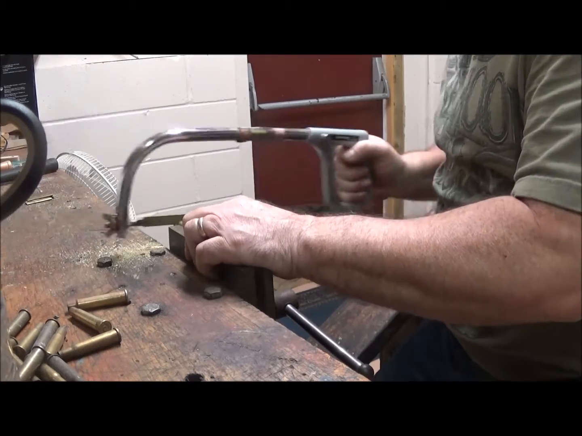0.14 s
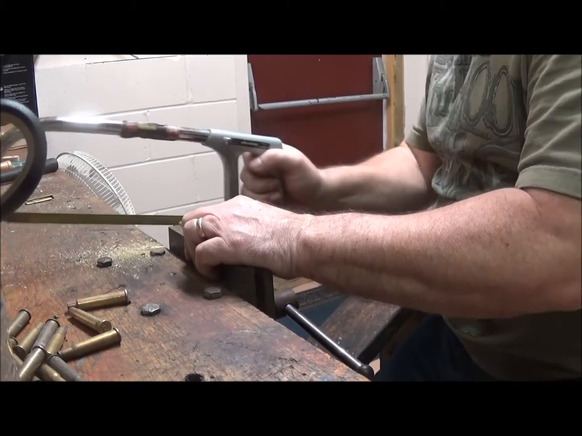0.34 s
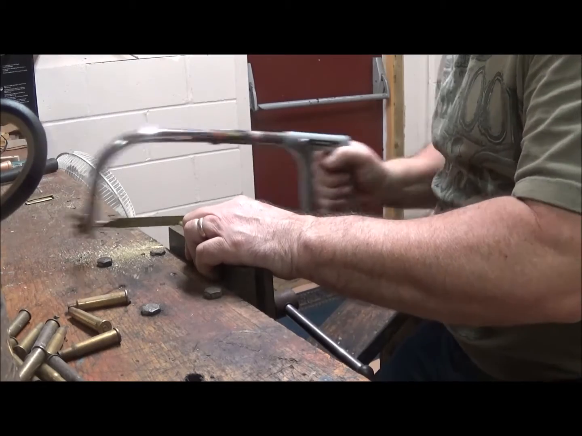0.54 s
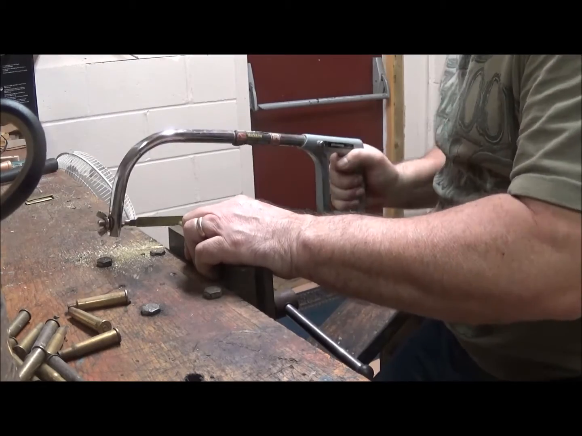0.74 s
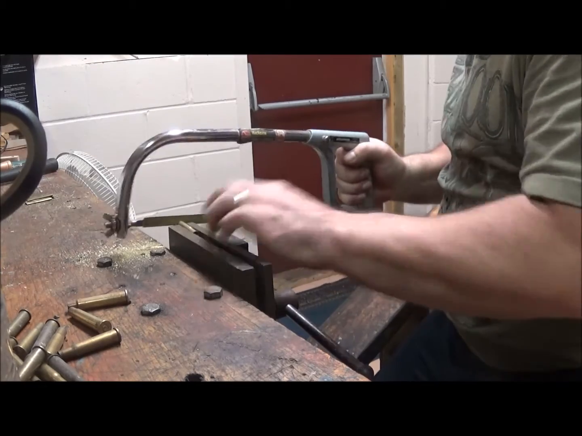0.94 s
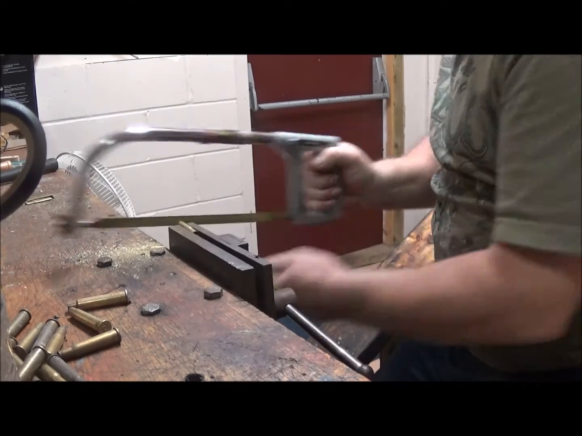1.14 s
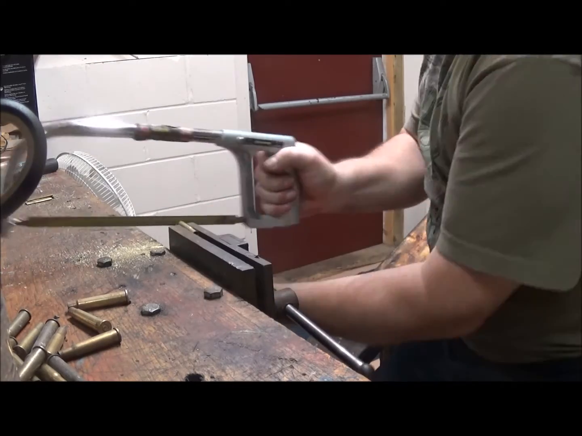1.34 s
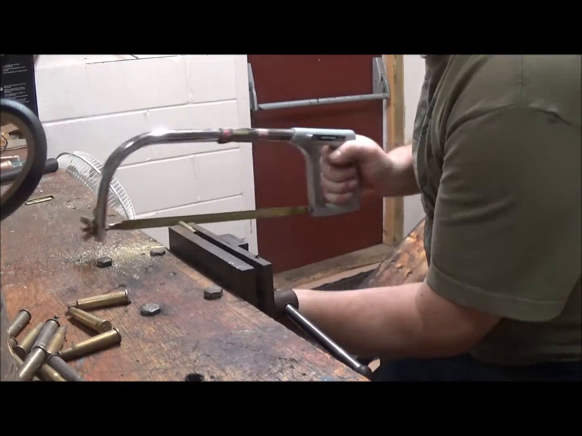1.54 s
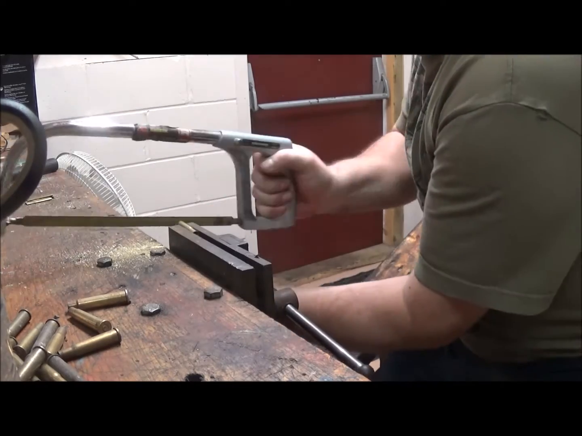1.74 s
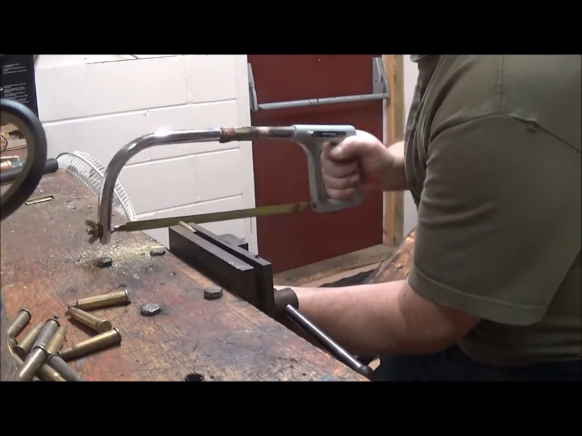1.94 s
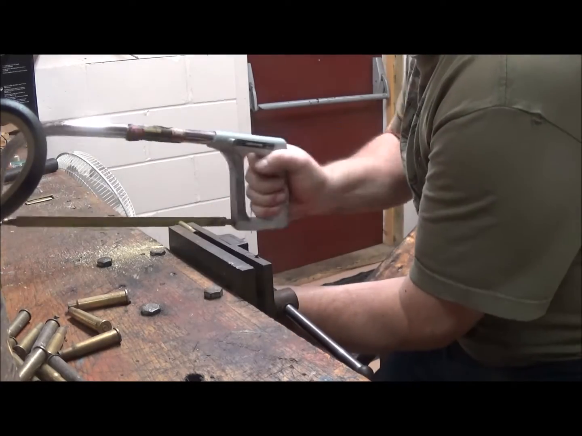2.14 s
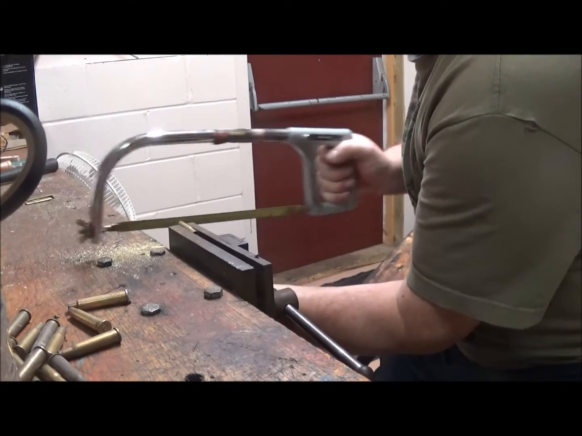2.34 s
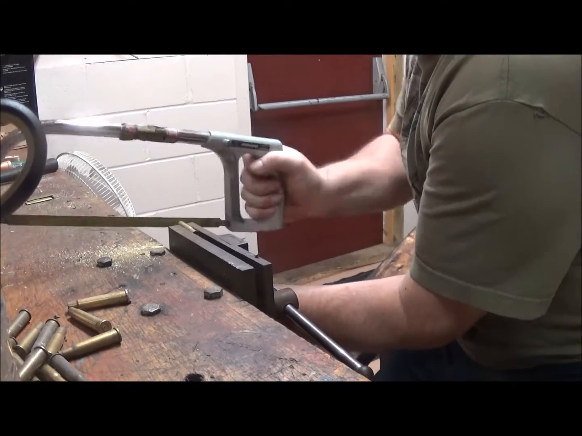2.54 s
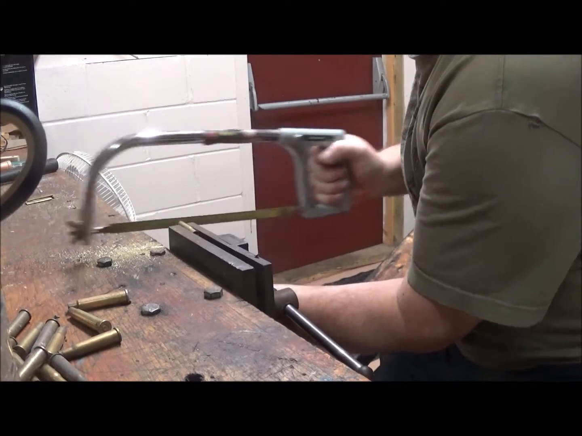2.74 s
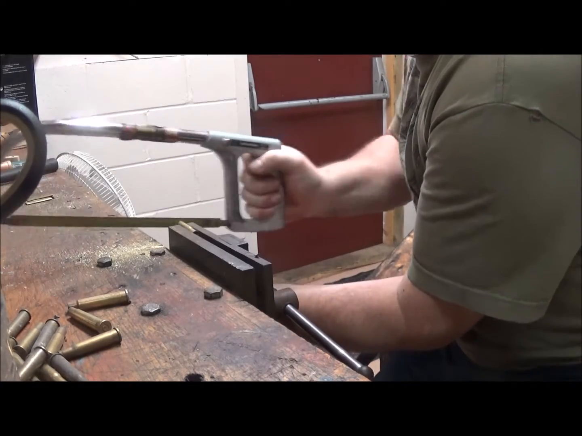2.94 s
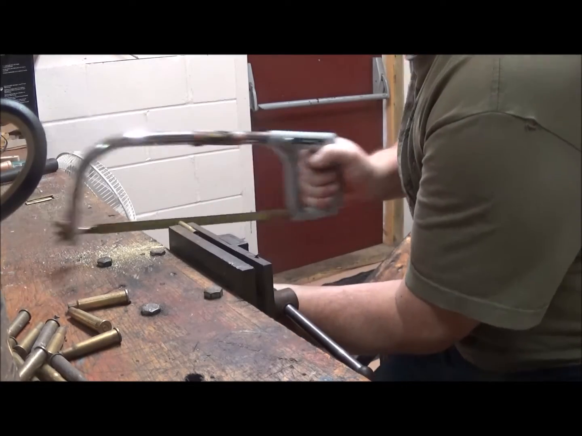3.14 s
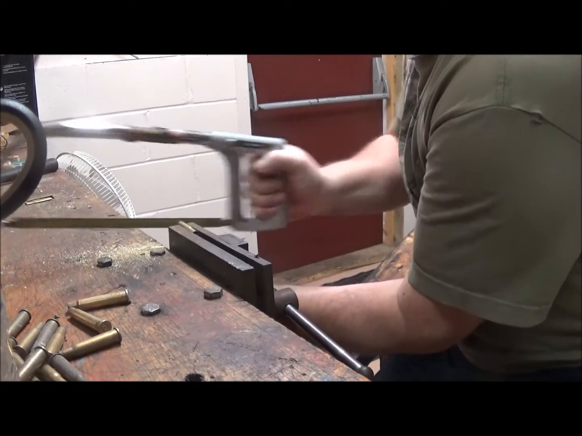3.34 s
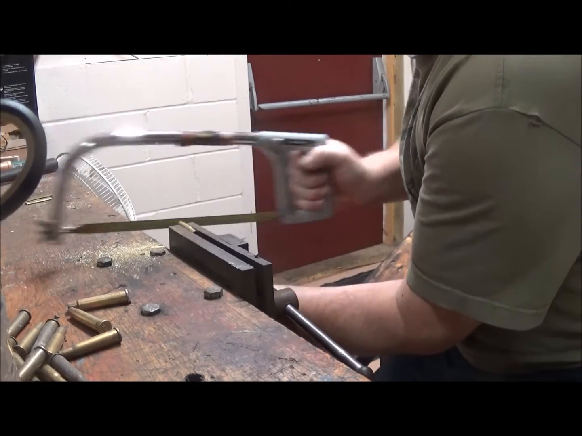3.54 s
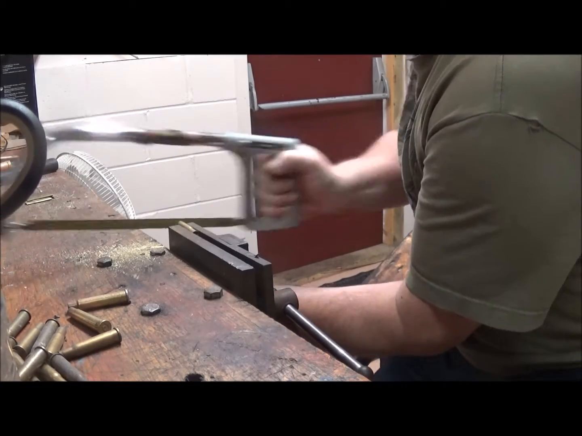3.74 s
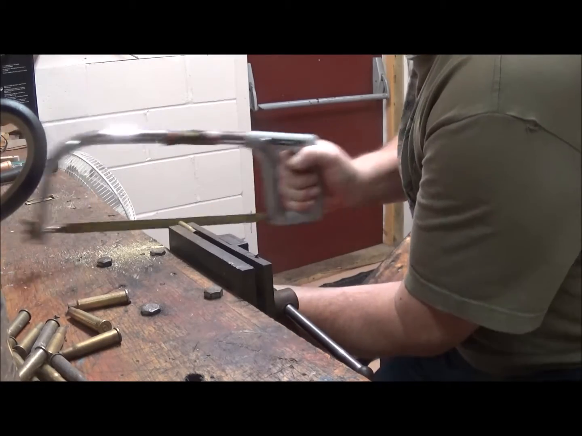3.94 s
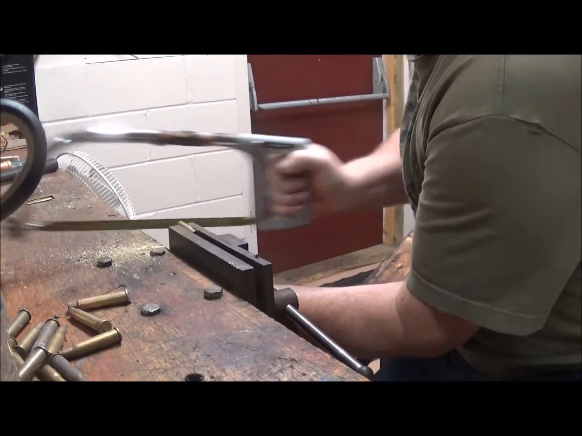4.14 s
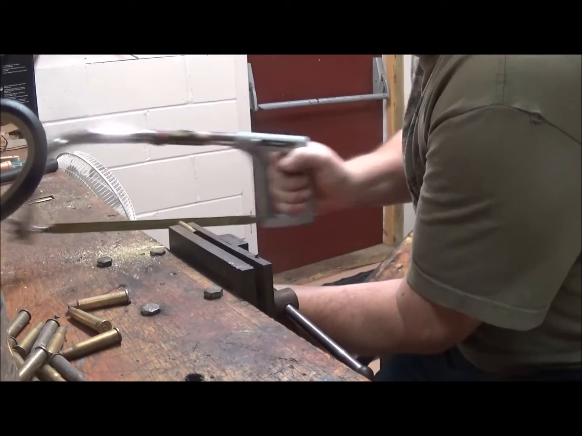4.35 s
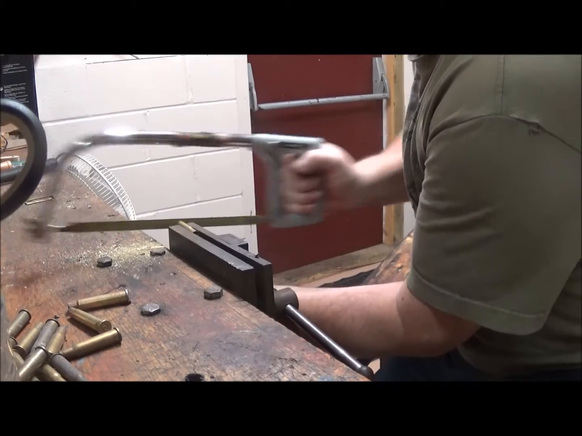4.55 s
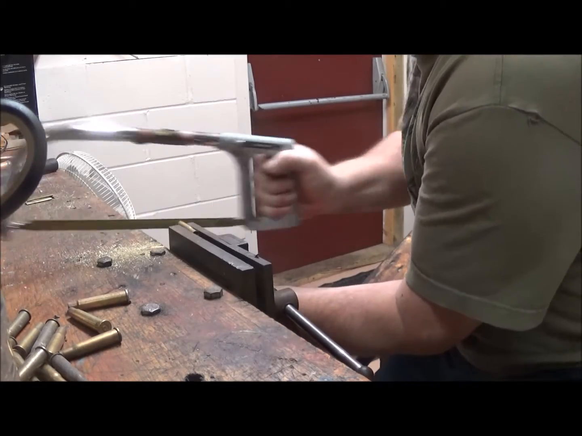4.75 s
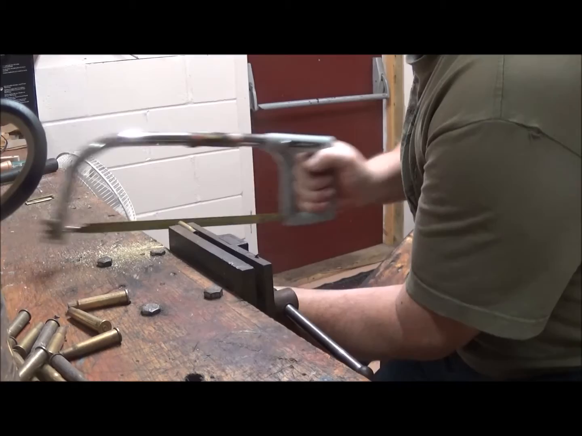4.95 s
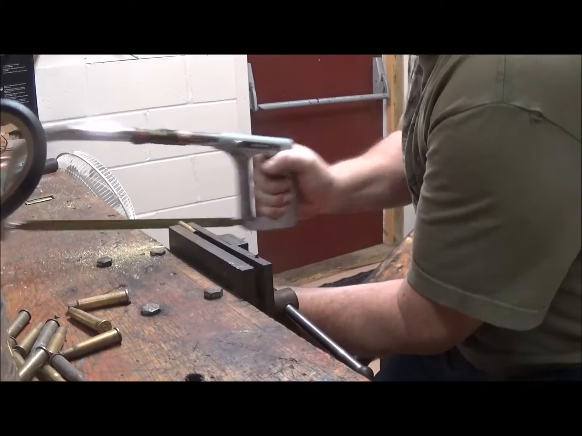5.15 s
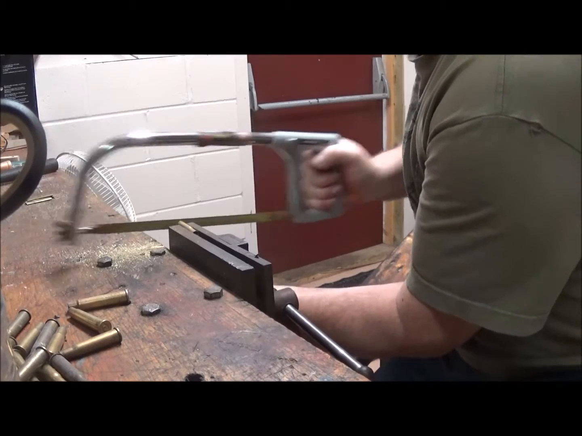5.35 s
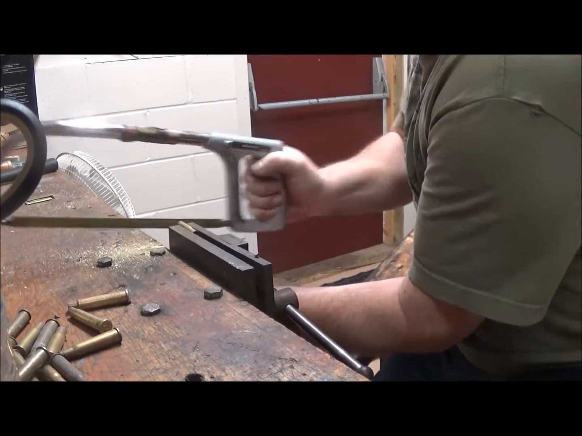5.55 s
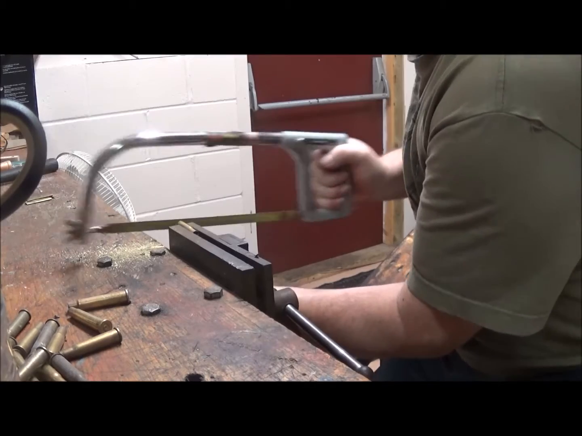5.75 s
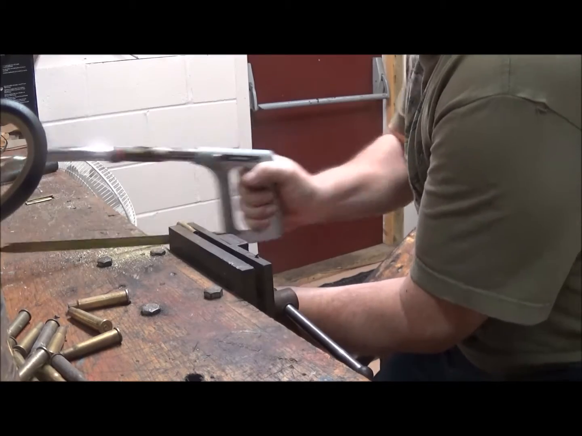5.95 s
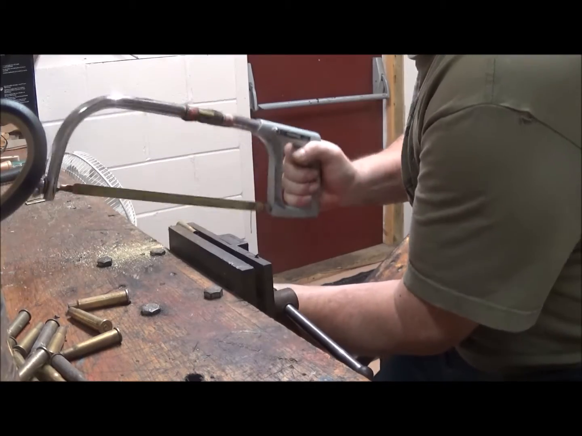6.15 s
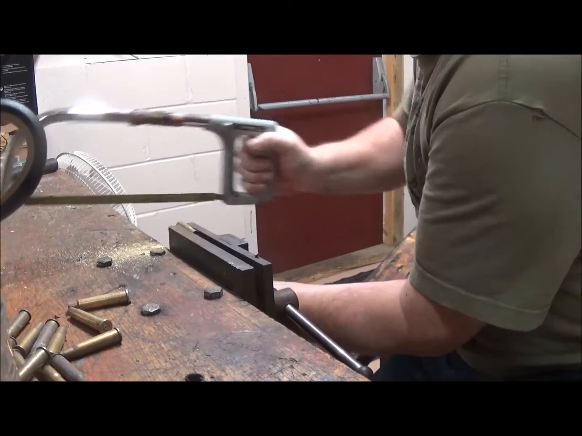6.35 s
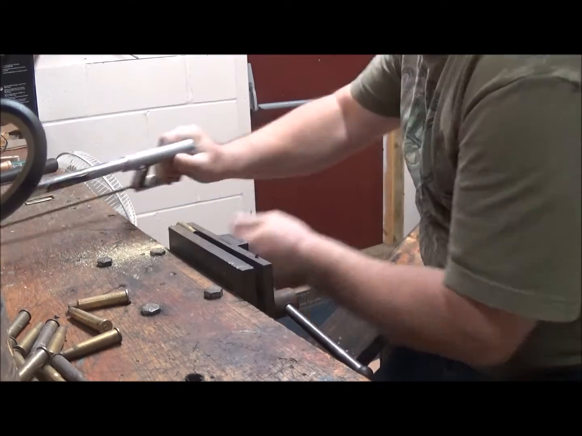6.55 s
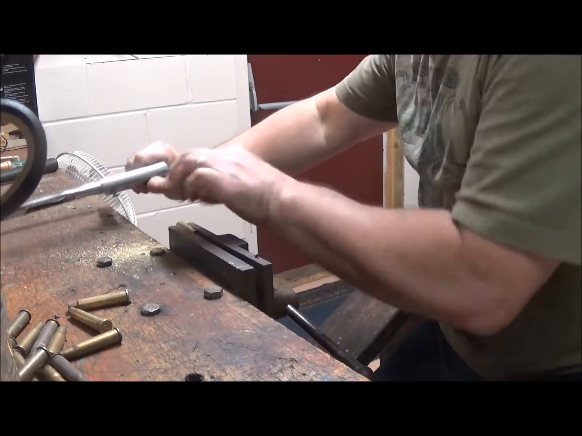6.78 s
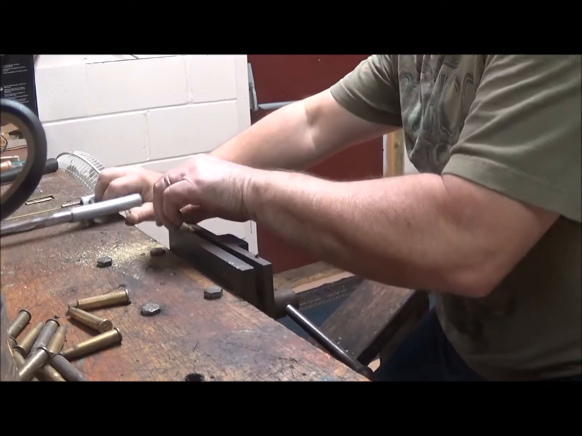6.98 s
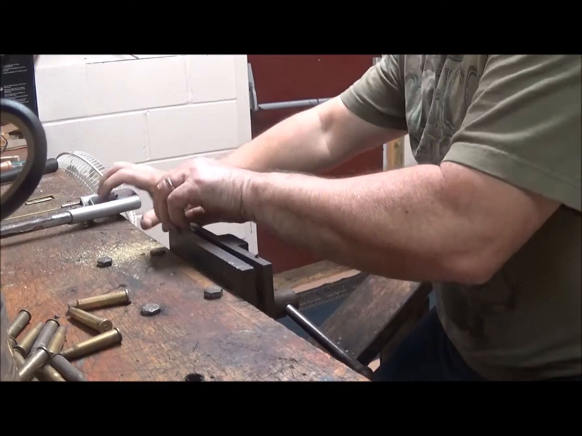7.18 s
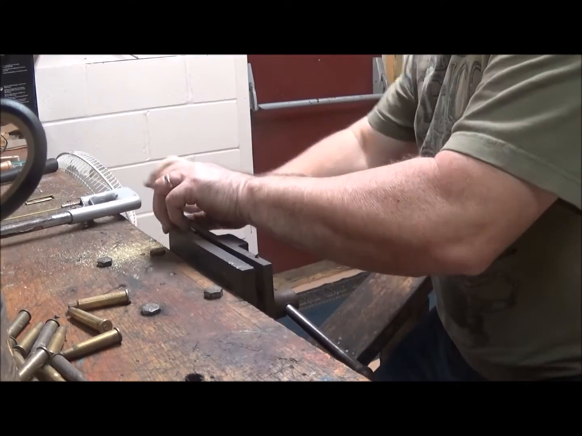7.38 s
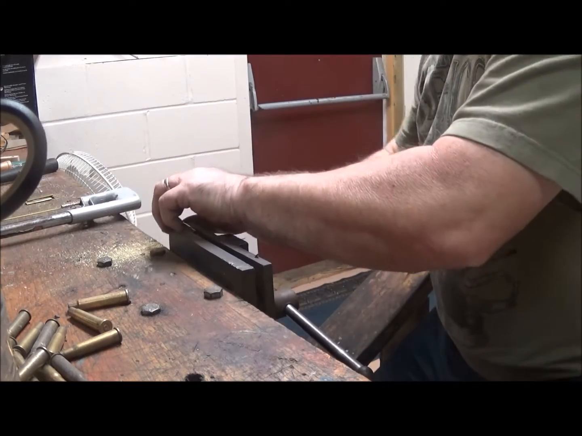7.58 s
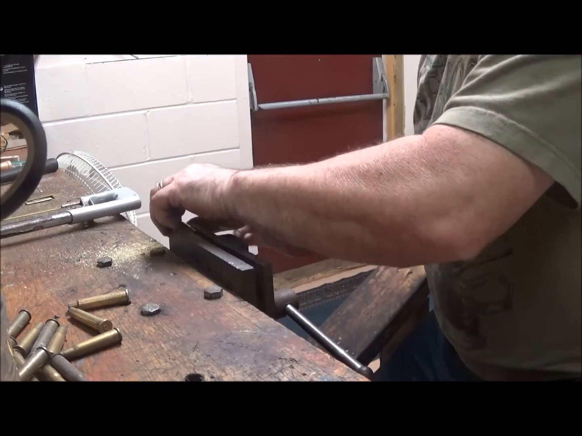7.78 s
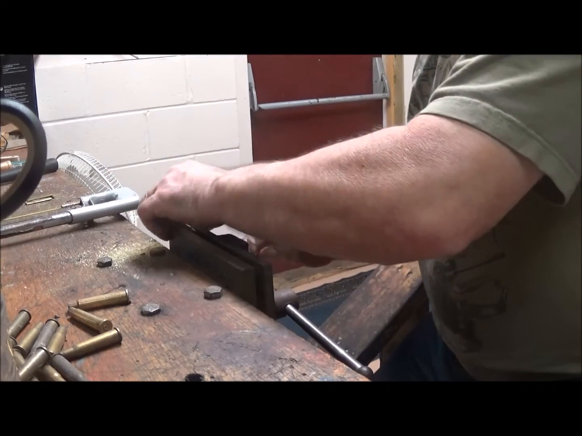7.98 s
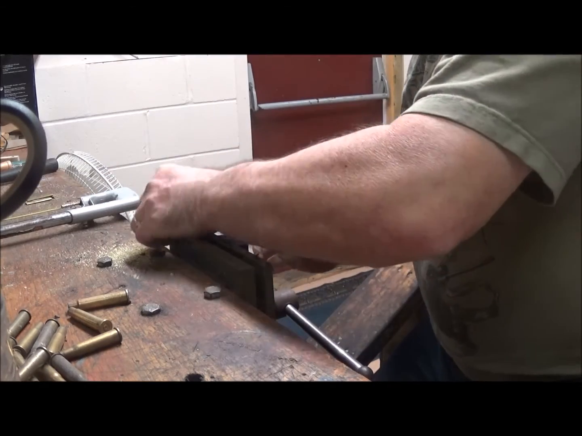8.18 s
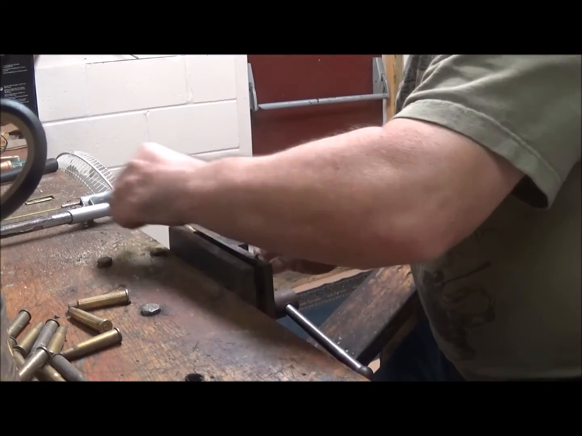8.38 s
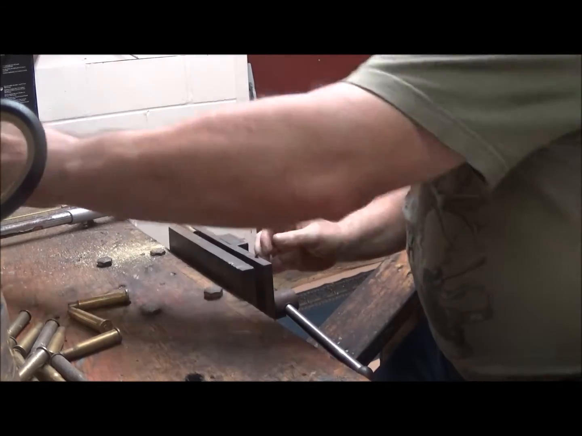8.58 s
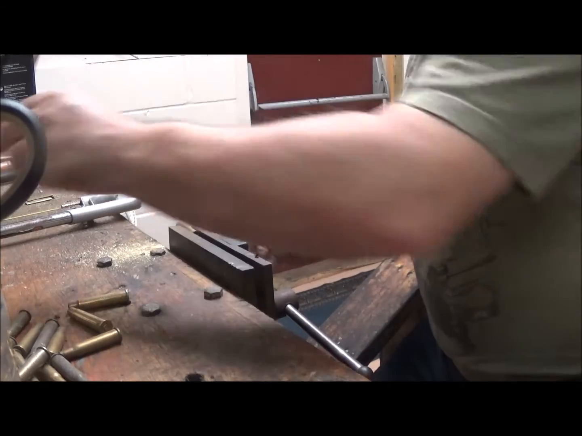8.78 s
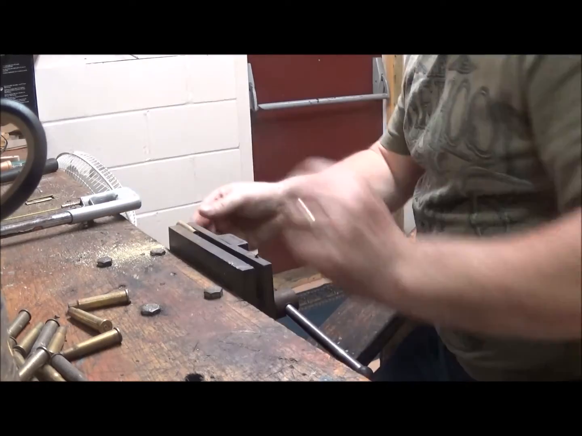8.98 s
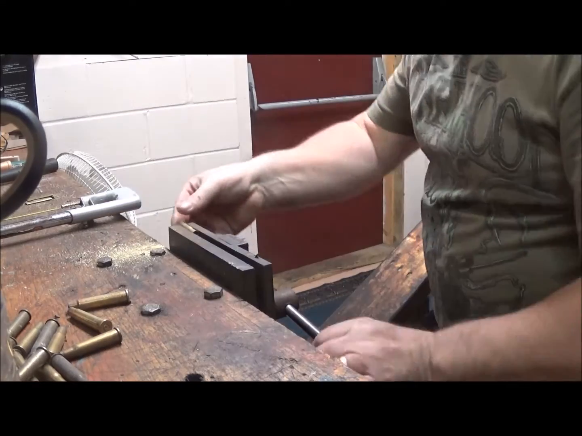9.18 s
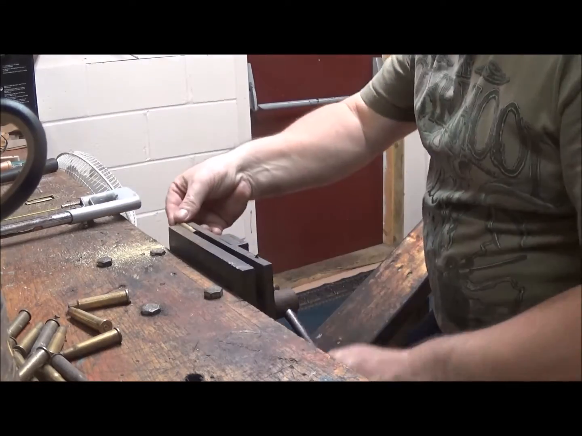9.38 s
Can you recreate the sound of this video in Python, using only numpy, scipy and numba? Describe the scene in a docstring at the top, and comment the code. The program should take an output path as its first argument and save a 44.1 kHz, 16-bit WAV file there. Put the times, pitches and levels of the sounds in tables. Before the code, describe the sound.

A hacksaw cuts a brass case in a vise from the start, close by, in a small workshop with a short echo and faint hum. After a brief hesitation just before 1 second, it settles into about two and a half back-and-forth strokes per second. The teeth buzz, rasp and occasionally snag, shaking the bench, while a metallic ring falls in pitch. Tiny high squeaks join from about 4 seconds. The sawing ends just after 6 seconds. Around 6.5 seconds the saw clatters onto the bench with several knocks, then scrapes briefly aside until about 7.2 seconds. It goes quiet, with a faint hiss slowly rising and one light tap at 8.2 seconds. At about 8.8 seconds the cut brass piece drops with a bright ping and rolls over with two small ticks. A hand softly rubs the bench from about 9.1 seconds.

```python
"""Over the faint air and hum of a small workshop, a hacksaw cuts a brass case held in a vise.
Its teeth buzz at a rate set by the blade's speed, tear off chips and shake vise and bench; the brass
wall rings lower as the cut deepens. After six seconds the saw clatters onto the bench and is pushed
aside, and a faint background hiss slowly rises. The cut piece drops with a bright ping and rolls over
as a hand rubs the bench. Throughout, block walls add a short echo and a limiter holds the peaks."""
import sys
import numpy as np
from scipy import signal
from scipy.fft import rfft, irfft
from scipy.io import wavfile
from scipy.ndimage import uniform_filter1d
from numba import njit

SR = 44100
rng = np.random.default_rng(int(sys.argv[2]) if len(sys.argv) > 2 else 0)


def waveform_to_disk(signal):
    """Save audio, clipped to [-1, 1], as 16-bit WAV at the path in sys.argv[1]."""
    frames = np.transpose(np.atleast_2d(signal))
    scaled = np.clip(frames, -1, 1) * 32767
    samples = np.round(scaled).astype(np.int16)
    wavfile.write(sys.argv[1], SR, samples)


N = 415418
T = np.arange(N) / SR

# Spectrum of the room's air. Each row: frequency in Hz, gain in dB.
AIR_SPECTRUM = [(25, -16), (110, 11.5), (253, -7), (304, 2.5), (364, -6.5), (3150, -9.5), (15000, -25)]
# Hum and whine of an appliance. Each row: frequency in Hz, level in dB.
HUM_TONES = [(307, -59.5), (3207, -73)]
# A push and its pull back. Each row: start and turn in seconds, pressure of push and of pull in dB,
# top tooth rate of the push in Hz, share of the push before top speed, singing gain in dB.
STROKES = [(-.22, -0.029, 0, -4.5, 899.2, 0.45, 0), (.196, .41, 4, -4.5, 910, .42, 2.5),
           (0.677, .87, -44.5, -29.5, 901.1, .4, 8), (1.069, 1.314, -2.5, -10.5, 861.6, 0.46, 9),
           (1.574, 1.759, -3, -2.5, 961.5, .22, -15), (1.989, 2.188, 0.5, -0.5, 913.3, 0.24, -2),
           (2.402, 2.602, 0, -4, 953.4, .27, 4.5), (2.82, 3.019, -2, -6.5, 960.5, .25, 6.5),
           (3.246, 3.444, -3.5, -3.5, 903.8, 0.32, 5.5), (3.66, 3.871, -3, -8, 950, 0.29, 8.5),
           (4.084, 4.282, -1.5, -6, 1014, .22, 13), (4.5, 4.705, 1, -3, 1034, .25, 6.5),
           (4.926, 5.128, 1, -5, 1026, .2, 11), (5.334, 5.538, -2, -5.5, 1021, .25, 10.5),
           (5.742, 5.954, -0.5, -20, 924, .38, 10.5)]
# Resonances of vise and work, the vise's mount, the blade (middle, top, squeak), the bench, the saw's
# frame, its slide and the rolling brass. Each row: frequency in Hz, bandwidth in Hz, gain in dB.
VISE_MODES = [(724, 42, -10), (816.2, 50.5, 1), (885.5, 91, -2), (977, 60, -11.5), (1135, 14, -9)]
MOUNT_MODES = [(221, 79, -8), (425, 55, -1), (573, 76, -0.5)]
BLADE_MODES = [(1655, 87, 4), (2490, 120, 7), (2667, 42, -0.5), (3700, 27, -1.5), (4650, 30, 3.5)]
BLADE_TOP_MODES = [(6350, 110, 1), (8260, 140, 1), (9160, 220, -4), (9950, 190, 1)]
SQUEAK_MODES = [(8480, 160, 0)]
BENCH_MODES = [(113.8, 9.9, -4), (127.2, 29, -1.5)]
FRAME_MODES = [(412, 36, 2), (562, 76, 6), (1145, 19, 7), (2220, 83, -6), (2550, 88, -1.5), (3210, 91, 3),
               (3400, 8, 4), (6430, 120, -8), (10000, 28, 0)]
SLIDE_MODES = [(145.5, 100, 19.6), (390, 84, 9.8), (644, 63, 17)]
ROLL_MODES = [(5050, 30, 0), (8080, 30, -13)]
# Spectra of tearing, impact, hiss and rubbing. Each row: frequency in Hz, gain in dB.
CHIP_SPECTRUM = [(300, -44.5), (900, 3), (2600, -4.5), (5200, -14), (9600, -5), (12000, -23), (15500, -30)]
THUD_SPECTRUM = [(60, -34), (105, 1.5), (212, 3), (572, 1.5), (1220, -10.5), (3290, -10), (13000, -30.5)]
HISS_SPECTRUM = [(200, 0), (10000, -10.5), (15000, -21.5)]
HAND_SPECTRUM = [(40, -11), (110, 7.5), (700, -4), (1300, -17), (12000, -35.5)]
# The falling resonance of the brass wall. Each row: time in seconds, frequency in Hz, gain in dB.
WALL_RING = [(.1, 3790, -7), (.55, 3770, 1), (1.25, 3750, -6), (1.5, 3270, 8), (1.91, 3040, 4),
             (2.3, 2770, 7), (2.48, 2620, 2), (2.72, 2280, 5), (3.2, 2000, -3), (4.4, 1650, -14)]
# Brief events: teeth snag, the bench is jolted, the blade squeaks, the cut piece rolls over.
# Each row: time in seconds, level in dB.
HARD_SNAGS = [(.447, 7), (.642, -6), (1.827, 13), (2.222, 16), (3.484, 5), (4.368, 11.5), (4.398, 8.5),
              (4.462, 10), (5.195, 6), (5.621, 20.5), (5.909, 17.5)]
JOLTS = [(0.359, -1.5), (0.653, -4), (0.95, -9.5), (1.079, 0), (1.688, -9)]
SQUEAKS = [(4.2, -14), (4.635, -15.5), (5.045, -13.5), (5.47, -16.5), (5.857, -8)]
ROLLS = [(8.998, -39), (9.333, -39.5)]
# The saw hits the bench. Each row: time in seconds, thud in dB, frame ring in dB, thud cutoff in Hz.
KNOCKS = [(6.472, -3, 2.5, 12000), (6.479, -4.5, -2.5, 9000), (6.53, 0, -7.5, 10100),
          (6.562, -0.5, -18.5, 1950), (6.611, -3, -11.5, 5000), (6.81, -5.5, -16.5, 10900),
          (8.188, -26.5, -42, 10100)]
# Envelopes of the sliding saw, the hiss and the hand. Each row: time in seconds, level in dB.
SLIDE_LEVELS = [(6.72, -42), (6.83, -27), (6.99, -27), (7.03, -19.5), (7.16, -46), (7.42, -57)]
HISS_LEVELS = [(7.2, -64), (8.6, -53.5), (9.42, -50.5)]
HAND_LEVELS = [(9.13, -41), (9.15, -34), (9.42, -38.5)]
# The cut piece lands and chatters. Each row: time in seconds, ping in dB, thud in dB.
LANDINGS = [(8.753, 1.5, -30), (8.766, -0.5, -44), (8.795, -16, -57)]
# Its free vibration. Each row: frequency in Hz, level in dB, time to fall 60 dB in seconds.
BRASS_MODES = [(4770, -5, 0.077), (4945, 4, 0.065), (4965, -21.5, 0.46), (8040, 2, 0.16), (8048, -11, .25),
               (8172, -17, .22), (11690, -10.5, 0.1), (14500, -17, .087)]
# The vise lies left, the bench right. Each row: frequency in Hz, left minus right in dB.
BALANCE = [(120, -2), (300, 3), (700, 4), (1500, 1.2), (10000, .3)]

PUSH_FULLNESS = .75  # exponent; below 1 the push holds its speed longer
PULL_RATE, PULL_CREST = 1.12, .55  # top speed relative to the push; share before top speed
PUSH_BITE_DB, PULL_BITE_DB = -7, -13.5  # teeth dig in forwards and drag backwards
TURN_S, REST_S = .02, .008  # standstill before a pull and before a push
LIFT_S, LIFT_DB_PER_S, SAW_END_S = 5.979, 142, 6.15  # the blade is eased out of the cut
TOP_HZ = 15750


def undb(db):
    """Decibels to amplitude ratio."""
    return 10 ** (np.asarray(db) / 20)


def unit(x):
    """Normalisation to rms 1."""
    return x / np.sqrt(np.mean(x ** 2))


def noise():
    """White Gaussian noise."""
    return rng.standard_normal(N)


def walk(rate_hz):
    """Moving averages smooth noise into a wander of rms 1."""
    span = max(2, int(SR / rate_hz))
    return unit(uniform_filter1d(uniform_filter1d(noise(), span), span))


def fade(rows):
    """Envelope through (s, dB) rows, silent before the first."""
    return undb(np.interp(T, *np.transpose(rows), left=-120))


def swells(rows, length_s):
    """Gaussian envelopes centred on (s, dB) rows."""
    return sum(undb(db) * np.exp(-np.minimum(((T - s) / length_s) ** 2, 50)) for s, db in rows)


def convolve(x, response):
    """A linear system convolves its input with its impulse response."""
    return signal.fftconvolve(x, response)[:N]


def colour(x, points, size=4096):
    """Minimum-phase filter of unit energy, shaped by (Hz, dB) points."""
    hz, db = np.transpose(points)
    grid = np.maximum(np.arange(size // 2 + 1) * SR / size, 1)
    cepstrum = irfft(np.log(undb(np.interp(np.log(grid), np.log(hz), db))))
    cepstrum[1:size // 2] *= 2
    cepstrum[size // 2 + 1:] = 0
    response = irfft(np.exp(rfft(cepstrum)))
    return convolve(x, response / np.linalg.norm(response))


def resonate(x, modes):
    """Forced vibration: the responses of (Hz, bandwidth, dB) modes add."""
    f = np.maximum(np.arange(SR // 2 + 1), 1)
    response = irfft(sum(undb(db) / (1 + 1j * (f * f - hz * hz) / (f * w)) for hz, w, db in modes))
    return convolve(x, response[:SR // 2])


@njit
def glide(x, hz, width_hz):
    """State-variable resonator with a moving centre frequency."""
    y, band, low = np.empty(len(x)), 0., 0.
    for i in range(len(x)):
        g, damping = np.tan(np.pi * hz[i] / SR), width_hz / hz[i]
        v = (band + g * (x[i] - low)) / (1 + g * (g + damping))
        band, low, y[i] = 2 * v - band, low + 2 * g * v, damping * v
    return y


def decay(t60):
    """One second of exponential decay, falling 60 dB in t60 seconds."""
    return np.exp(-np.log(1000) * T[:SR] / t60)


def burst(t60):
    """Decaying noise, the broadband force of a contact."""
    return rng.standard_normal(SR) * decay(t60)


def blows(times, levels_db, sound):
    """Superposition of a fresh sound() at each time."""
    out = np.zeros(N + SR)
    for s, db in zip(times, levels_db):
        out[int(s * SR):int(s * SR) + SR] += undb(db) * sound()
    return out[:N]


def workshop_air():
    """Air noise, partly correlated between channels, lies under an appliance's wavering tones."""
    hum = 0
    for hz, db in HUM_TONES:
        phase = 2 * np.pi * np.cumsum(hz * (1 + .00291 * walk(8.4))) / SR
        hum += undb(db) * np.sqrt(2) * np.sin(phase)
    shared = noise()
    return np.array([undb(-57) * colour(unit(shared + .5 * noise()), AIR_SPECTRUM) + hum
                     for _ in range(2)])


def swing(travel, crest):
    """Speed (0-1) from rest to rest: a skewed half sine peaking at the share crest of its time."""
    skew = np.log(.5) / np.log(np.clip(crest, .05, .95))
    return np.abs(np.sin(np.pi * np.clip(travel, 0, 1) ** skew))


def arm():
    """Reciprocating motion: a sharp push and an even pull, with tooth rate proportional to speed."""
    starts = np.transpose(STROKES)[0]
    stroke = np.maximum(np.searchsorted(starts, T, side="right") - 1, 0)
    start, turn, push_db, pull_db, top_hz, crest, sing_db = np.transpose(STROKES)[:, stroke]
    end = np.append(starts[1:], SAW_END_S)[stroke] - REST_S
    pushing = T < turn
    travel = (T - start) / (turn - start - TURN_S)
    pull_speed = swing((T - turn) / (end - turn), PULL_CREST)
    speed = np.where(pushing, swing(travel, crest) ** PUSH_FULLNESS, pull_speed)
    tooth_hz = top_hz * speed * np.where(pushing, 1, PULL_RATE)
    press = undb(np.where(pushing, push_db, pull_db) - LIFT_DB_PER_S * np.maximum(T - LIFT_S, 0))
    bite = undb(np.where(pushing, PUSH_BITE_DB, PULL_BITE_DB))
    sing = np.exp(-((travel - .52) / .22) ** 2)  # in mid-push the teeth cut evenly and sing
    return speed, tooth_hz, press, bite, sing, undb(sing_db * sing)


def teeth(speed, tooth_hz, press, bite, sing, sing_gain):
    """Periodic tooth impacts give a buzz, its second harmonic and pulsed friction noise (grit)."""
    jitter = (.022 + .08 * (1 - sing) ** 2) * walk(300)
    phase = 2 * np.pi * np.cumsum(tooth_hz * (1 + jitter)) / SR
    pulses = np.exp(np.cos(phase) - 1)
    # a blade that does not bite skips, and it stalls just before a snag breaks free
    judder = undb(5.2 * walk(75) * (1 - .7 * sing) / (1 + bite))
    stall = undb(-8 * swells([(s - .011, 0) for s, _ in catches()], .009))
    force = press * stall * judder
    grit = force * unit(noise() * (pulses + .4) * undb(2.8 * walk(600)))
    cut = force * bite * speed * sing_gain * undb(4 * (1 - sing) * walk(150))
    # uneven chips smear the buzz into a growl
    growl_hz = .8 * tooth_hz + 170
    growl = undb(18.5 - 9 * sing) * glide(glide(grit * speed ** .6, growl_hz, 420.), growl_hz, 420.)
    buzz = cut * np.sin(phase) + bite * growl
    return buzz, undb(-16) * cut * np.sin(2 * phase), grit


def vise(buzz, grit, speed):
    """Buzz and friction force the vise and its mount into resonance."""
    tone = undb(-4.5) * resonate(buzz, VISE_MODES) + undb(-6.5) * resonate(buzz, MOUNT_MODES)
    scrape = undb(7.5) * resonate(grit * speed ** .54, VISE_MODES)
    return tone + scrape + undb(-5) * resonate(grit * speed ** .3, MOUNT_MODES)


def chips_and_blade(grit, speed):
    """Tearing chips radiate noise and excite the blade's modes, both rising steeply with speed."""
    chips = undb(-9) * colour(grit * speed ** 2.83, CHIP_SPECTRUM)
    blade = undb(-5) * resonate(grit * speed ** 3.53, BLADE_MODES)
    return chips + blade + undb(-7) * resonate(grit * speed ** 5.1, BLADE_TOP_MODES)


def brass_wall(grit, speed):
    """The chattering wall's resonance falls as the cut deepens, strongest as the blade breaks through."""
    s, hz, db = np.transpose(WALL_RING)
    gain = undb(np.interp(T, s, db) + 7 * walk(130))
    return gain * glide(grit * speed ** 1.3, np.interp(T, s, hz), 160.)


def bench_rumble(press, speed):
    """The bench's low modes are driven hardest while the teeth pass slowly."""
    shaking = noise() * np.sqrt(press) * speed ** .055 * undb(-10 * speed)
    return undb(6.5) * resonate(shaking, BENCH_MODES)


def catches(delay_s=.011):
    """Snags as (s, dB): one early in each push, proportional to its pressure, plus the hard ones."""
    return [(s + delay_s, push_db) for s, _, push_db, *_ in STROKES if s > 0] + HARD_SNAGS


def snags():
    """Impulse excitation: a catching tooth rings the vise and tears chips."""
    force = blows(*np.transpose(catches()), lambda: burst(.015) * (1 - decay(.01)))
    return undb(12.5) * resonate(force, VISE_MODES) + undb(-30.5) * colour(force, CHIP_SPECTRUM)


def jolts():
    """Transient forces excite the low modes of bench and mount."""
    force = blows(*np.transpose(JOLTS), lambda: burst(.19))
    dulled = colour(force, [(500, 5), (5000, -16.5)])
    return undb(14) * resonate(force, BENCH_MODES) + undb(-11.5) * resonate(dulled, MOUNT_MODES)


def squeaks():
    """Friction briefly excites one high resonance as the blade slows."""
    return unit(resonate(noise(), SQUEAK_MODES)) * swells(SQUEAKS, .0078)


def hacksaw():
    """Source and resonator: the teeth sound directly and through everything they shake."""
    speed, tooth_hz, press, bite, sing, sing_gain = arm()
    buzz, harmonic, grit = teeth(speed, tooth_hz, press, bite, sing, sing_gain)
    direct = undb(-11.5) * buzz + harmonic
    metal = vise(buzz, grit, speed) + chips_and_blade(grit, speed) + squeaks() + brass_wall(grit, speed)
    return direct + metal + bench_rumble(press, speed) + snags() + jolts()


def saw_laid_down():
    """Impacts thud on the bench and ring the frame; the saw then slides by stick-slip friction."""
    contacts = 0
    for s, thud_db, _, cutoff_hz in KNOCKS:
        lowpass = signal.butter(4, cutoff_hz, fs=SR, output="sos")
        contacts += signal.sosfilt(lowpass, blows([s], [thud_db], lambda: burst(.053)))
    thuds = undb(-9) * colour(contacts, THUD_SPECTRUM)
    times, _, ring_db, _ = np.transpose(KNOCKS)
    frame = undb(2) * resonate(blows(times, ring_db, lambda: burst(.13)), FRAME_MODES)
    friction = noise() * undb(2.9 * walk(180))
    slips = colour(friction, [(45, -26), (130, -1), (800, 2.5), (1400, -7), (12000, -15)])
    return thuds + frame + unit(resonate(slips, SLIDE_MODES)) * fade(SLIDE_LEVELS)


def rising_hiss():
    """Broadband noise under a growing envelope: a faint hiss slowly rises after the sawing."""
    return colour(noise() * undb(walk(15)), HISS_SPECTRUM) * fade(HISS_LEVELS)


def brass_ring():
    """Free vibration in damped modes; phases are random, as each blow lands on another spot."""
    return sum(undb(db) * decay(t60) * np.sin(2 * np.pi * (hz * T[:SR] + rng.random()))
               for hz, db, t60 in BRASS_MODES)


def dropped_brass():
    """Each impact rings the short tube, with a crack and a thud; rolling over excites it softly."""
    times, ping_db, thud_db = np.transpose(LANDINGS)
    ping = blows(times, ping_db, brass_ring)
    crack = colour(blows(times, ping_db, lambda: burst(.11)),
                   [(2000, -21), (4800, 13), (6500, -3), (8200, 2), (10000, 10), (15000, -38)])
    thud = colour(blows(times, thud_db, lambda: burst(.27)),
                  [(70, -17), (170, 16.5), (300, 6), (900, -10.5), (3000, -44)])
    roll = resonate(noise() * swells(ROLLS, .0057), ROLL_MODES)
    return undb(-7) * ping + undb(-18.5) * crack + undb(7) * thud + undb(26) * roll


def hand():
    """Friction of a hand on the bench gives low, uneven noise."""
    return colour(noise() * undb(2 * walk(71)), HAND_SPECTRUM) * fade(HAND_LEVELS)


def room(x, wet_db=-6, t60=.27, spread=.34):
    """Reverberation: wall reflections, nearly alike in both channels, add to the direct sound."""
    def echo(spectrum):
        reflections = burst(t60) * (1 - np.exp(-T[:SR] / .00018))
        tail = colour(np.pad(reflections, (0, N - SR)), spectrum)[:SR]
        return convolve(x, tail / np.linalg.norm(tail))
    mid = echo([(120, 9.9), (2000, 10.4), (15000, 5.5)])
    side = spread * echo([(900, 5.5), (8000, 2.5), (15000, -33.5)])
    pan_db = np.interp(np.arange(N // 2 + 1) * SR / N, *np.transpose(BALANCE))
    return np.array([irfft(rfft(x + undb(wet_db) * (mid + sign * side)) * undb(sign * pan_db / 2), N)
                     for sign in (1, -1)])


def scene():
    """The sources superpose in one small room; the brass lands further to the left."""
    brass = room(dropped_brass()) * undb([[1.06], [-1.06]])
    return room(hacksaw() + saw_laid_down() + hand() + rising_hiss()) + brass + workshop_air()


@njit
def follow(peaks, attack, release):
    """Envelope follower with separate rates of rise and fall."""
    out, level = np.empty(len(peaks)), 0.
    for i in range(len(peaks)):
        level += (peaks[i] - level) * (attack if peaks[i] > level else release)
        out[i] = level
    return out


def record(dry, ceiling=1.0, attack_s=.00004, release_s=.058):
    """A high-pass thins the bass, a limiter lowers the gain at peaks, and a low-pass cuts the top."""
    thin = signal.sosfilt(signal.butter(2, 65, "high", fs=SR, output="sos"), dry)
    attack, release = 1 - np.exp(-1 / (attack_s * SR)), 1 - np.exp(-1 / (release_s * SR))
    envelope = follow(np.abs(thin).max(axis=0), attack, release)
    held = np.clip(thin * np.minimum(1, ceiling / (envelope + 1e-9)), -1, 1)
    return signal.sosfilt(signal.ellip(10, .2, 80, TOP_HZ, fs=SR, output="sos"), held)


dry = scene()
out = record(dry)
waveform_to_disk(out)
```